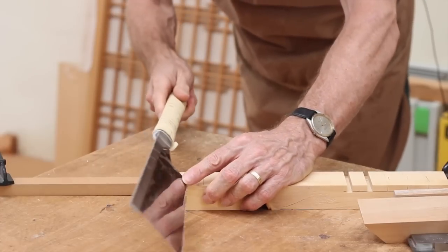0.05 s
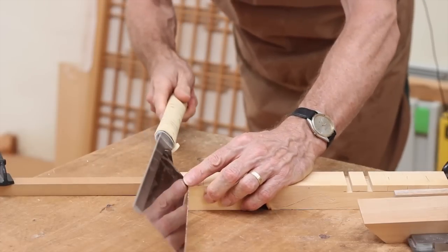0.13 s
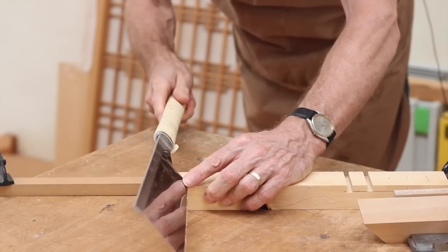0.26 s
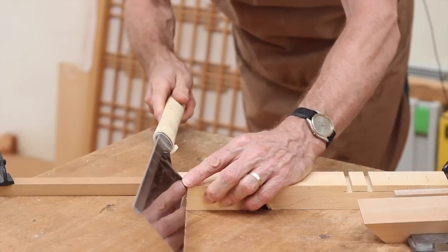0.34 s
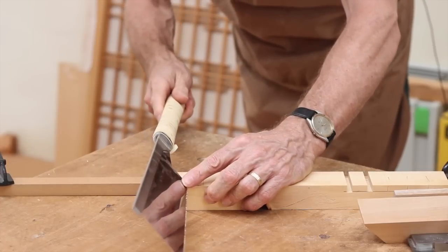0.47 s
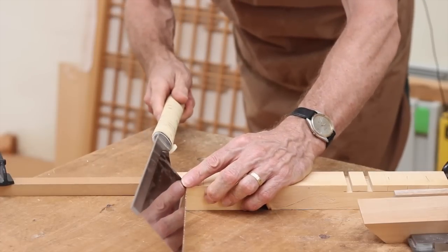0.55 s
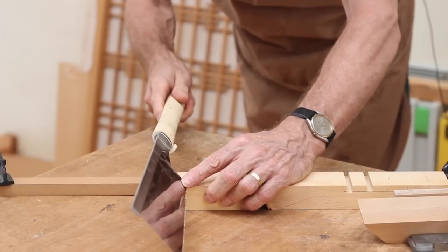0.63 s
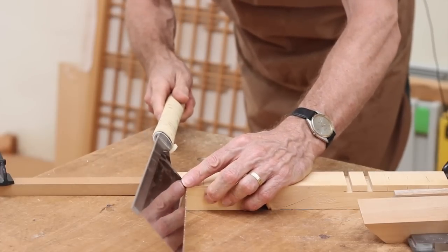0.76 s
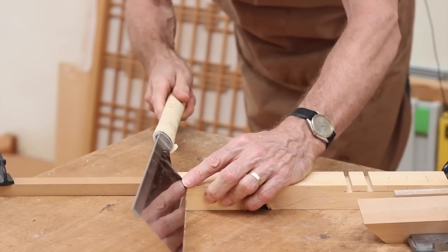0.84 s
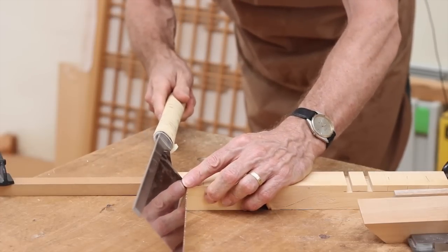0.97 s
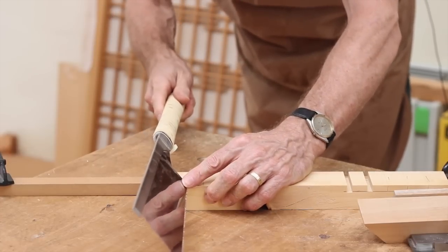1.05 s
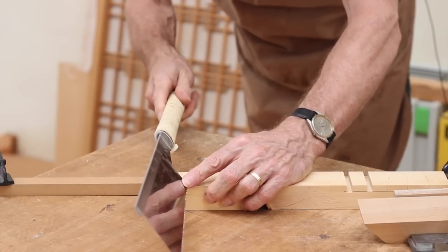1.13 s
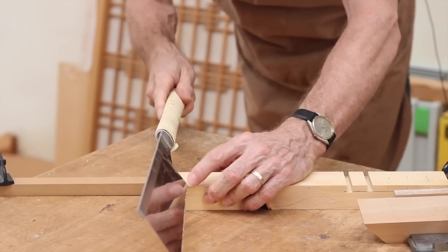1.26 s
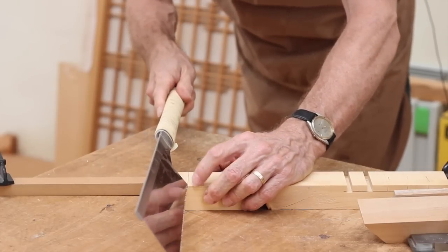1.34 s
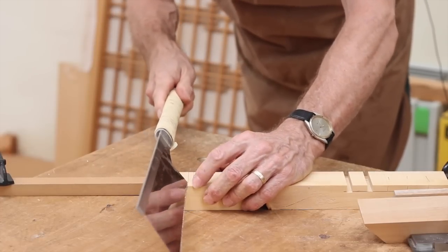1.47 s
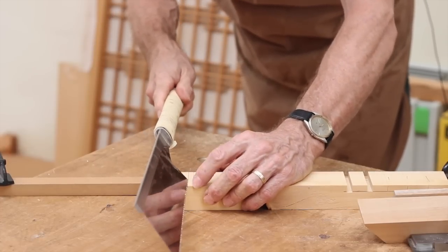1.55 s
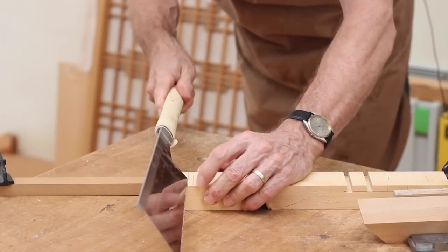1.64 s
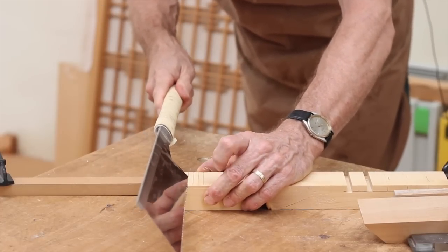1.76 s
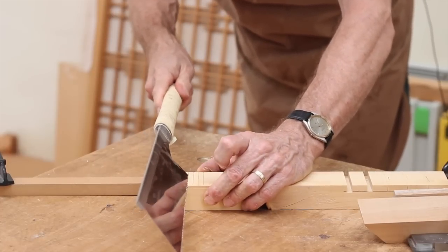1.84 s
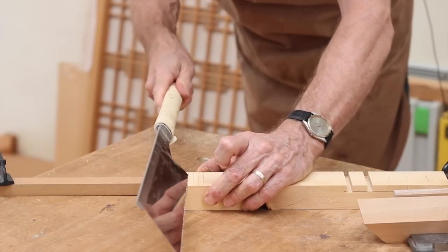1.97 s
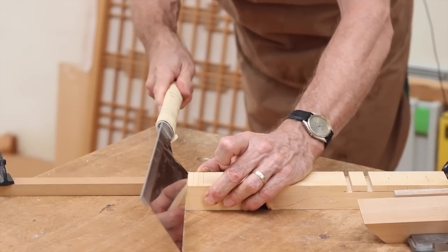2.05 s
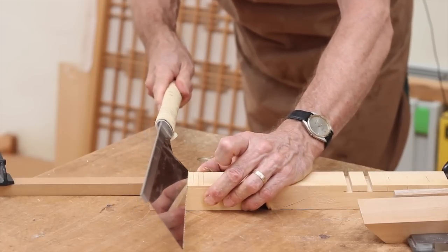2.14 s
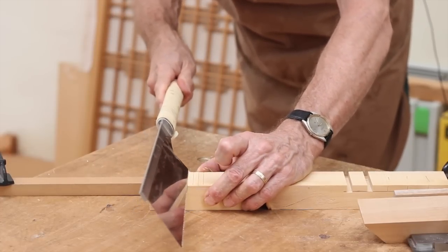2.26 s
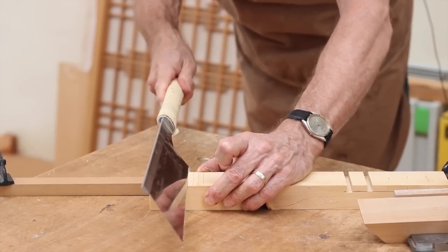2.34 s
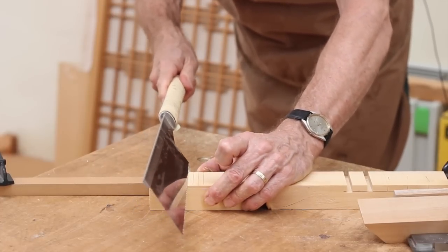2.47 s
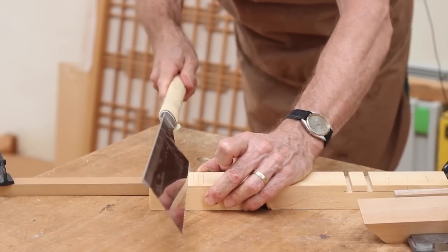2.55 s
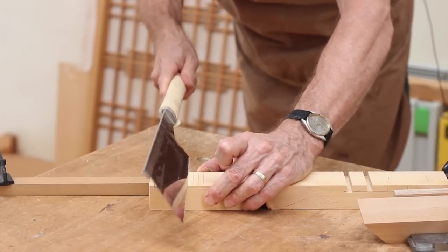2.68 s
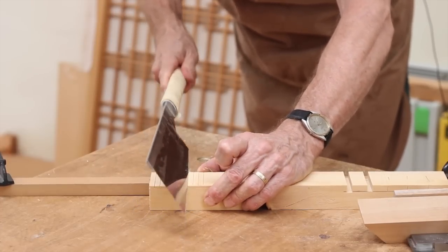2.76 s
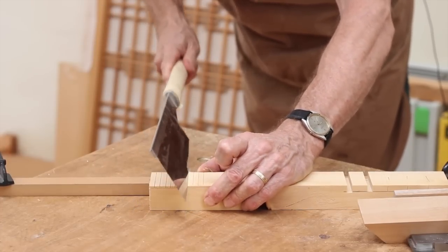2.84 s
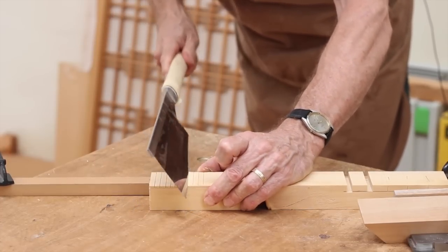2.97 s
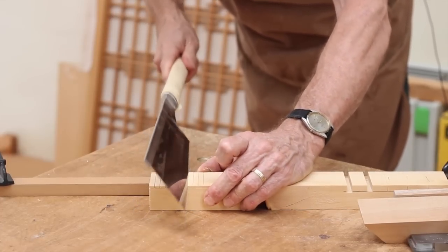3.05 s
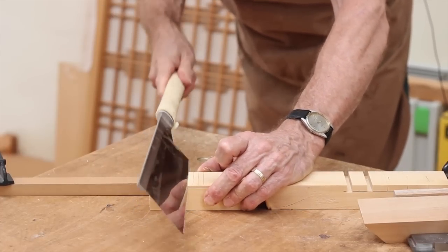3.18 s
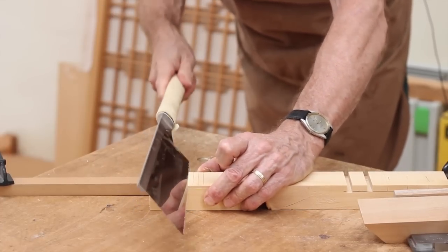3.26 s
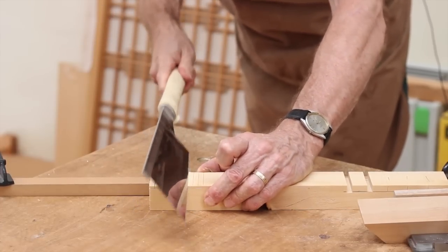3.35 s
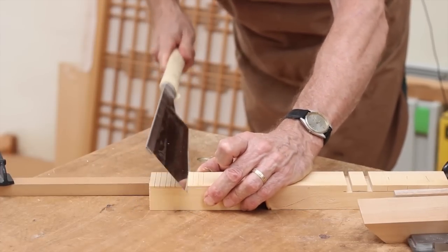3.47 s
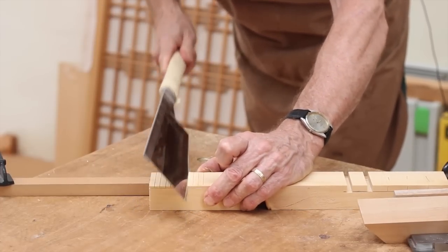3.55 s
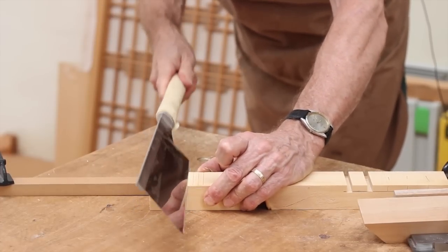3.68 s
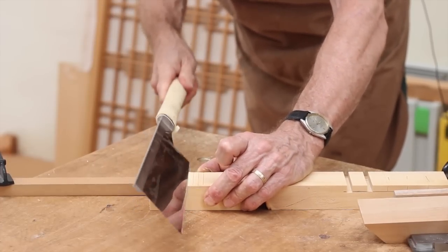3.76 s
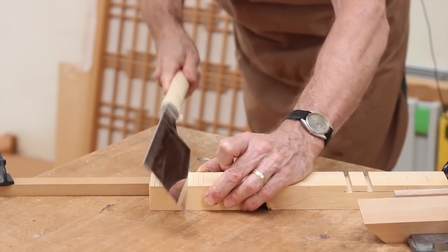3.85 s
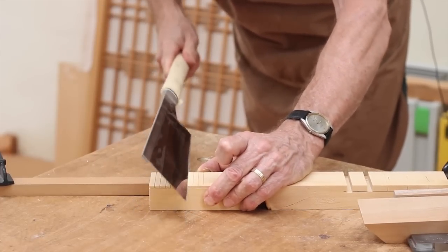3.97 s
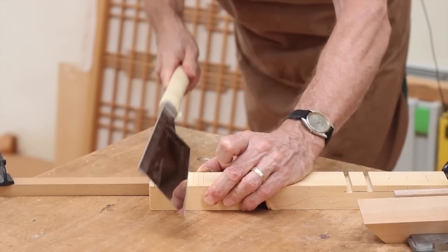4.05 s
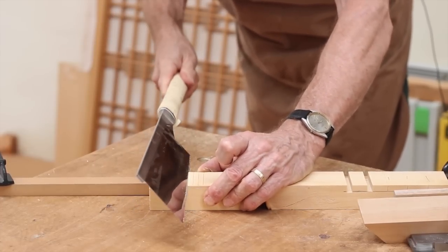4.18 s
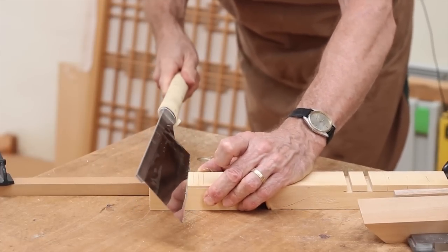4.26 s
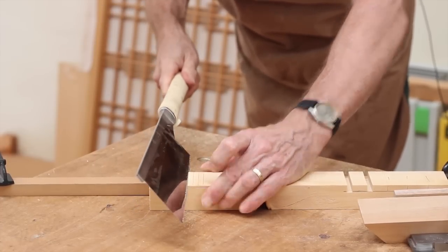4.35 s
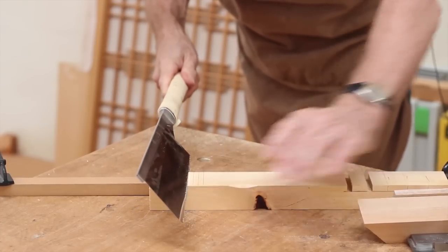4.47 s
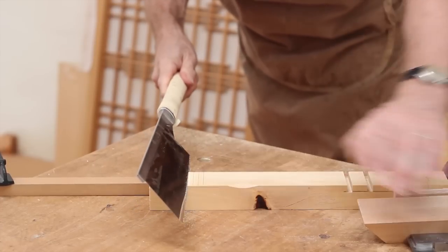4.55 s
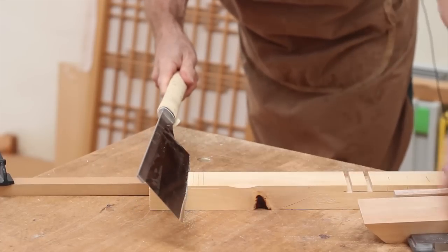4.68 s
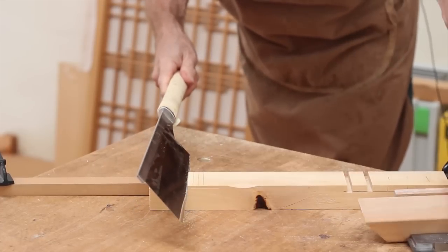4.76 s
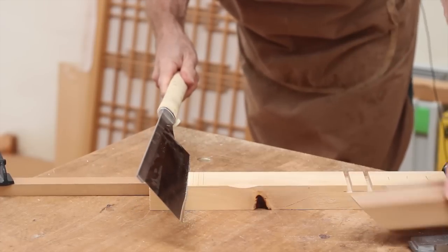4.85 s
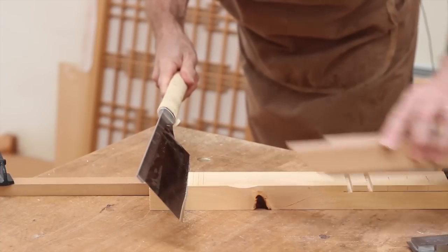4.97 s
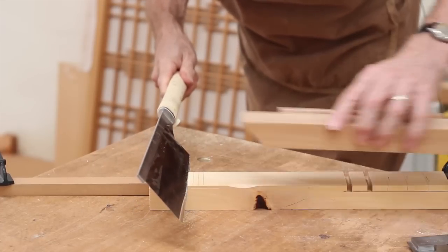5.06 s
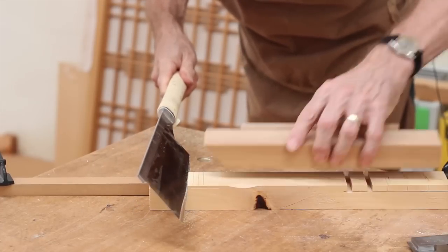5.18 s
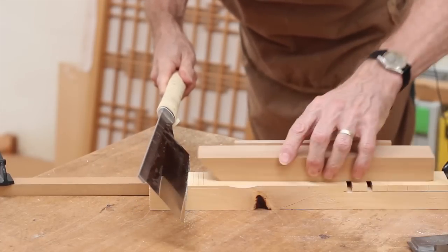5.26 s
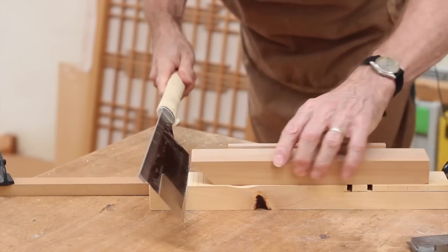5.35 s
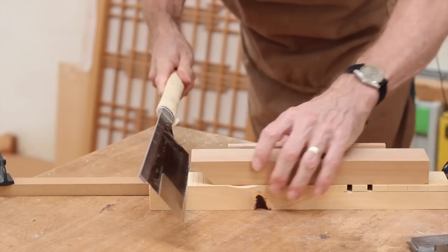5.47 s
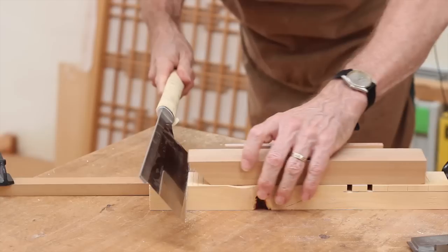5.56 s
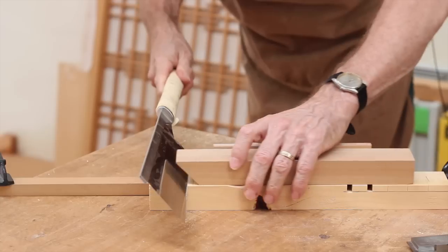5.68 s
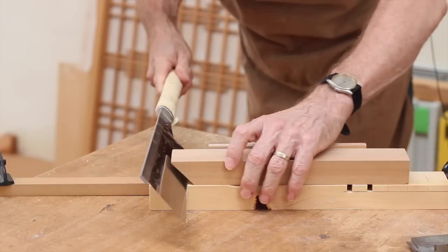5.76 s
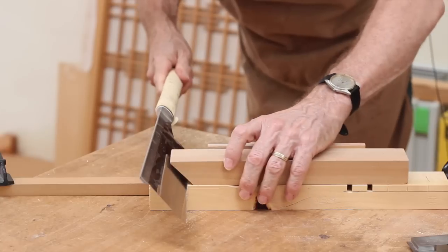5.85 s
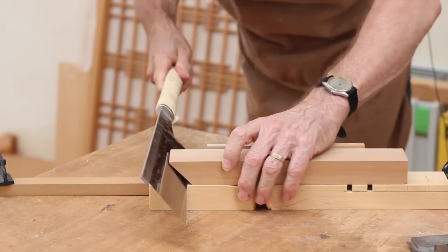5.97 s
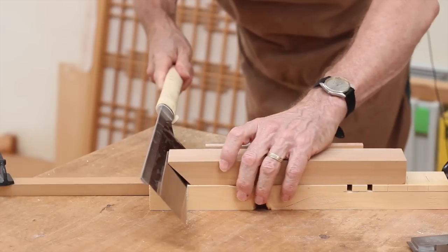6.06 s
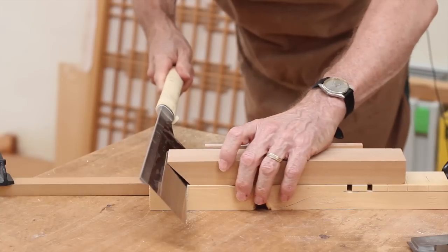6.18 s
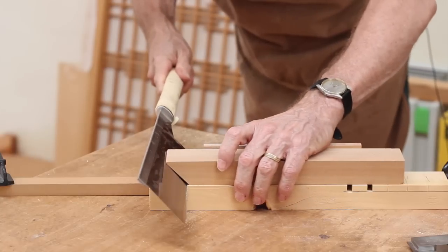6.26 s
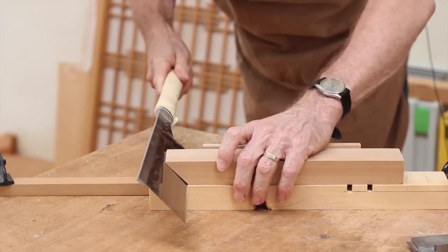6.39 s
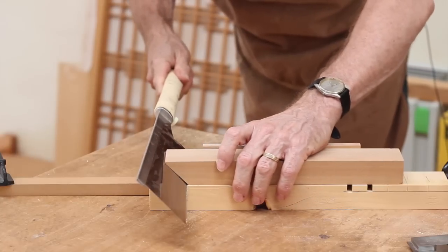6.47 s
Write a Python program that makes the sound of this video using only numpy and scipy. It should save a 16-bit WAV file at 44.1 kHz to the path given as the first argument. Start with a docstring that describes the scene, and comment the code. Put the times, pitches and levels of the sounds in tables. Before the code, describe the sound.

Low room rumble, soft air and electronic hiss run throughout; the work is close, in the left channel only, with a short workshop reverberation, while the right carries just hiss. For the first 1.4 seconds there are only faint tooth ticks and a few dull creaks. From 1.5 to 2.3 light, scratchy saw strokes mix with more low woody creaks as the hands shift. From 2.35 to 2.95 teeth catch in the fibres: uneven, crackling snaps with bright splintering. From 3.1 to 4.25 the saw runs freely in four quick rasps, roughly four per second, the one near 3.5 strongest and groaning. Sawing stops. A sleeve brushes at 4.6 to 4.75; at 4.9 a block drags briefly, juddering, with a tiny bright steel clink. At 5.37 it lands with a loud, hard wooden clack, a tight cluster of contacts, smaller taps at 5.45, then a faint settling slide and near quiet until 6.5.

```python
"""In a workshop, a pull saw crosscuts a batten held down on a bench, amid room air, low rumble and hiss.
The first strokes are light, then the teeth catch and snap fibres, then they run freely.
Each tooth is a click that shakes the batten, bench and blade; torn fibres and rubbing are coloured noise.
Dull creaks are runs of clicks as the hands shift; the sleeve and the dragged block are swelling noise.
The block clinks on a steel tool, then knocks on the work: clicks set off decaying tones and noise."""
import sys
import numpy as np
from scipy import signal
from scipy.fft import rfft, irfft
from scipy.io import wavfile
from scipy.ndimage import uniform_filter1d

SR = 44100
rng = np.random.default_rng(int(sys.argv[2]) if len(sys.argv) > 2 else 0)


def dump_mix(stems):
    """Bounce the given channels to the path in sys.argv[1] as a 16-bit WAV at rate SR."""
    frames = np.atleast_2d(stems).T  # one column per channel
    limited = np.clip(frames, -1, 1)  # hard clip at full scale
    pcm = np.round(limited * 32767).astype(np.int16)
    wavfile.write(sys.argv[1], SR, pcm)


N = 287532
TIME = np.arange(N) / SR  # seconds


def from_db(db):
    """Turn decibels into an amplitude factor."""
    return 10 ** (np.asarray(db) / 20)


def rms_one(x):
    """Scale a sound to unit power."""
    return x / np.sqrt(np.mean(x ** 2) + 1e-20)


def running_rms(x, seconds):
    """Follow the level over a short sliding window."""
    window = max(int(seconds * SR), 2)
    return np.sqrt(np.abs(uniform_filter1d(x ** 2, window)) + 1e-12)


def level_curve(rows):
    """Draw straight lines between (time, dB) points and give the amplitude at every sample."""
    times, levels_db = np.transpose(rows)
    return from_db(np.interp(TIME, times, levels_db))


def at_hz(points, hz, axis=1):
    """Read one column of a spectrum on a log-frequency axis."""
    points = np.array(points)
    return np.interp(np.log(hz + 1), np.log(points[:, 0]), points[:, axis])


def response(spectrum, size=2048):
    """Make the minimum-phase pulse of a spectrum: it starts at once, and its peak is 1."""
    hz = np.linspace(0, SR / 2, size // 2 + 1)
    cepstrum = irfft(np.log(from_db(at_hz(spectrum, hz))))
    # folding the second half onto the first leaves nothing before the start
    cepstrum[1:size // 2] *= 2
    cepstrum[size // 2 + 1:] = 0
    pulse = irfft(np.exp(rfft(cepstrum)))
    return pulse / np.abs(pulse).max()


def colour(x, spectrum):
    """Pass a sound through a body with this spectrum."""
    return signal.fftconvolve(x, response(spectrum))[:N]


def noise(spectrum):
    """Make coloured noise of unit power."""
    return rms_one(colour(rng.standard_normal(N), spectrum))


def band(x, kind, hz, order=4):
    """Keep part of the frequency range with a Butterworth filter."""
    return signal.sosfilt(signal.butter(order, hz, kind, fs=SR, output="sos"), x)


def smooth(x, seconds):
    """Smooth a signal with one pole."""
    r = np.exp(-1 / (seconds * SR))
    return signal.lfilter([1 - r], [1, -r], x + 1e-18)


def flutter(hz):
    """Wander at random below this frequency, with unit spread."""
    return rms_one(band(rng.standard_normal(N), "low", hz, order=2))


def clicks(rows, axis=1):
    """Place one impulse for each event, at the level in the given column."""
    rows, out = np.array(rows), np.zeros(N)
    samples = (rows[:, 0] * SR).astype(int)
    out[samples] = from_db(rows[:, axis])
    return out


def splinter(x, seconds):
    """Turn each click into a dying puff of noise with the same energy."""
    envelope = np.sqrt(smooth(x ** 2, seconds))
    return envelope * rng.standard_normal(N)


def ring(x, modes):
    """Strike a body: a unit click starts each of its modes as a decaying sine."""
    out = 0
    for hz, db, t60 in modes:
        r, w = from_db(-60 / (t60 * SR)), 2 * np.pi * hz / SR
        sine = signal.lfilter([0, np.sin(w)], [1, -2 * r * np.cos(w), r * r], x + 1e-18)
        out = out + from_db(db) * sine
    return out


def resonate(x, resonances):
    """Add up resonances, each with its listed gain at its top and a set width."""
    out = 0
    for hz, width, db in resonances:
        r = np.exp(-np.pi * width / SR)
        top_is_one = np.array([1, 0, -1]) * (1 - r * r) / 2
        poles = [1, -2 * r * np.cos(2 * np.pi * hz / SR), r * r]
        out = out + from_db(db) * signal.lfilter(top_is_one, poles, x)
    return out


def preamplifier_hiss():
    """Separate white noise in each channel, from the electronics."""
    return from_db(-52) * rng.standard_normal((2, N))


# low rumble colour: (frequency [Hz], level [dB])
RUMBLE_COLOUR = [(20, -3.5), (45, -3), (80, 4), (130, -2), (220, -1.5), (330, -7.5), (600, -24.5),
                 (2000, -39)]
# room air colour: (frequency [Hz], level [dB])
AIR_COLOUR = [(150, -25.5), (400, -3), (650, -3), (900, 1.5), (1150, -2), (1600, -8.5), (2300, -15.5),
              (3500, -26), (8000, -45)]
# loudness of the room air: (time [s], level [dB])
AIR_LEVEL = [(0, -42.5), (1.2, -42.5), (2.2, -43), (4.4, -42), (5.3, -45.5), (5.8, -47.5), (6.5, -47)]


def room_tone():
    """A steady low rumble under a band of air noise whose level drifts."""
    return from_db(-44.5) * noise(RUMBLE_COLOUR) + level_curve(AIR_LEVEL) * noise(AIR_COLOUR)


# reverberation: (frequency [Hz], time to fall by 60 dB [s], level [dB])
REVERBERATION = [(157, 0.67, 0), (412, 0.48, -3), (1080, 0.19, -17.5), (2290, 0.83, -22), (4650, 0.89, 0.5),
                 (12000, 0.28, -56)]


def workshop(x, size=32768):
    """Diffuse reflections, dying at their own pace in each octave."""
    t, tail = np.arange(size) / SR, 0
    for low in 62.5 * 2 ** np.arange(8):
        middle = low * np.sqrt(2)
        decay = from_db(-60 * t / at_hz(REVERBERATION, middle))
        # silent for 7.5 ms, then rising until 22.5 ms
        decay = decay * np.clip(t / 0.015 - .5, 0, 1)
        gain = from_db(at_hz(REVERBERATION, middle, axis=2)) / np.sqrt(np.sum(decay ** 2))
        octave = band(rng.standard_normal(size), "band", [low, 2 * low], order=2)
        tail = tail + gain * decay * octave
    return signal.fftconvolve(x, tail)[:N]


# dull creaks: (time [s], length [s], number of jerks, level before an overall lift [dB])
CREAK_RUNS = [(.0144, .0353, 4, -25), (.6578, .0264, 2, -23), (1.3823, .035, 3, -21),
              (1.4649, .038, 5, -21.5), (1.5209, .024, 2, -19), (1.5767, .0583, 4, -19),
              (1.6687, .0268, 2, -20.5), (1.7551, .0195, 2, -21.5), (1.9427, 0, 1, -20.5),
              (2.0534, .0427, 3, -18), (2.1401, .057, 2, -15), (4.345, .066, 2, -32),
              (4.5201, .054, 4, -26.5), (4.8929, .0217, 2, -25), (5.2787, .0318, 2, -25.5)]


def jerks():
    """Each creak sticks and slips at a nearly even pace: rows of (time, dB)."""
    jitter, spread_db = 0.13, 0.6  # share of the gap between jerks; spread of their strength
    rows = []
    for start, length, count, db in CREAK_RUNS:
        steps = np.arange(max(int(round(count)), 1))
        shift, strength = rng.standard_normal((2, len(steps)))
        inner = (steps > 0) * (steps < steps[-1])  # the first and last jerk stay in place
        wander = jitter * shift * inner
        times = start + length * (steps + wander) / max(steps[-1], 1)
        rows += zip(times, db + spread_db * strength)
    return rows


# creak colour: (frequency [Hz], level [dB])
CREAK_COLOUR = [(40, -52), (110, -15), (220, -2.5), (400, 1.5), (560, -3.5), (700, -14.5), (1350, -11.5),
                (1900, -32), (2700, -35), (3700, -28), (5000, -47), (16000, -51)]


def creaks():
    """Stick-slip jerks, one click each, heard through dull wood as the hands shift."""
    return from_db(3.5) * colour(clicks(jerks()), CREAK_COLOUR)


# sleeve sliding on the apron: (time [s], level [dB])
SLEEVE_LEVEL = [(4.55, -61), (4.59, -37), (4.65, -36), (4.72, -37.5), (4.78, -54)]
# cloth colour: (frequency [Hz], level [dB])
CLOTH_COLOUR = [(100, 2), (400, 3.5), (1300, -5.5), (2200, -7), (4000, -7), (7000, -16.5), (12000, -23),
                (16000, -35)]


def sleeve():
    """Cloth rubbing on cloth: soft noise that swells and fades."""
    return level_curve(SLEEVE_LEVEL) * noise(CLOTH_COLOUR)


# block dragged off the bench, before its judder: (time [s], level [dB])
DRAG_LEVEL = [(4.87, -82), (4.893, -36), (4.92, -30.5), (4.95, -29.5), (5.0, -52), (5.06, -75)]
# sliding wood colour: (frequency [Hz], level [dB])
SLIDE_COLOUR = [(80, 4.5), (300, 2), (600, 5), (1300, 3.5), (2200, -12.5), (4000, -20), (11000, -23),
                (16000, -43)]


def drag():
    """Wood sliding on wood: noise whose level judders at random."""
    judder = from_db(1.7 * flutter(hz=118))
    return level_curve(DRAG_LEVEL) * judder * noise(SLIDE_COLOUR)


# bright splinter colour: (frequency [Hz], level [dB])
SPLINTER_COLOUR = [(800, -12), (2000, 10.5), (3000, 2), (4500, -3), (7000, -13), (12500, -7), (16000, -5.5)]


def bright_splinters(x, seconds):
    """Short bright puffs of noise, one for each click."""
    return colour(splinter(x, seconds), SPLINTER_COLOUR)


# block brushing a steel tool: (time [s], level [dB])
CLINK_TOUCHES = [(4.889, -38), (4.905, -50), (4.919, -28)]
# steel tool modes: (frequency [Hz], level [dB], time to fall by 60 dB [s])
STEEL_MODES = [(4700, -7, 0.12), (5060, -2.5, 0.05), (8600, -11, 0.054), (10560, -8, 0.035),
               (11700, -17, 0.077)]


def clinks():
    """Each touch rings the steel and adds a bright puff of noise."""
    touches = clicks(CLINK_TOUCHES)
    return ring(touches, STEEL_MODES) + from_db(13.5) * bright_splinters(touches, seconds=0.0028)


# block landing and settling: (time [s], ring and clatter level [dB], crack level [dB])
BLOCK_KNOCKS = [(5.3649, 7.5, 8), (5.3678, 1.5, 4.5), (5.3705, 3.5, 2), (5.3745, -16, -25),
                (5.3785, -1, -24), (5.4447, -21, 0.5), (5.4655, -32, -10), (5.6515, -24.5, -42),
                (6.121, -26, -41)]
# block modes: (frequency [Hz], level [dB], time to fall by 60 dB [s])
BLOCK_MODES = [(220, -37, .45), (240, -39, .09), (360, -36, .06), (490, -31, .04), (715, -35, .03),
               (885, -18, .03), (1030, -21, .025), (1349, -10, .032), (1537, -9, .035), (1655, -17, .028),
               (2003, -19, .024), (2235, -24, .022), (2463, -25, .022)]
# clatter of flat faces: (frequency [Hz], level [dB])
CLATTER_COLOUR = [(150, -26), (450, -19), (680, -26), (900, -6), (1400, 2), (2300, -7), (3000, -24),
                  (4300, -27), (16000, -55)]
# crack of a hard contact: (frequency [Hz], level [dB])
CRACK_COLOUR = [(100, -6), (600, -15), (1200, 19.5), (2300, 9.5), (3000, -3), (4000, -4.5), (5500, -11),
                (8000, -27), (16000, -62)]
# block sliding into place: (time [s], level [dB])
SETTLING_LEVEL = [(5.38, -70), (5.45, -42), (5.56, -59), (5.7, -45.5), (5.8, -47), (5.92, -54)]


def block():
    """Wood on wood: each contact cracks, clatters and rings the modes; then the block slides home."""
    blows = clicks(BLOCK_KNOCKS)
    ringing = ring(blows, BLOCK_MODES)
    clatter = colour(splinter(blows, seconds=.0035), CLATTER_COLOUR)
    crack = colour(splinter(clicks(BLOCK_KNOCKS, axis=2), seconds=0.00038), CRACK_COLOUR)
    slide = level_curve(SETTLING_LEVEL) * noise(CLATTER_COLOUR)
    # so small a block radiates almost no bass
    return band(ringing + clatter + crack + slide, "high", 97, order=2)


# paths from the teeth through the blade: plain list of delays [s]
BLADE_PATHS = [.0007, .0013, .0021, .0034]


def disperse(x):
    """A tooth's blow runs to and fro in the blade and comes out smeared over a few milliseconds."""
    for seconds in BLADE_PATHS:
        allpass = np.zeros(int(seconds * SR))
        allpass[0], allpass[-1] = .6, 1
        x = signal.lfilter(allpass, allpass[::-1], x)
    return x


# teeth snagging in the fibres: (time [s], snap level [dB], splinter level [dB])
SNAG_EVENTS = [(1.53, -32, -15), (1.617, -32, -13), (2.351, -22, -14), (2.376, -9.5, -6),
               (2.399, -4.5, -14.5), (2.422, -5.5, -22), (2.449, -4, -9), (2.46, -3.5, -15),
               (2.512, 1, -3.5), (2.526, 2.5, -6), (2.583, -10, -7), (2.598, -1, -8), (2.617, 1.5, -8.5),
               (2.729, -4.5, -0.5), (2.742, -12, -0.5), (2.753, -6, -5), (2.858, -3.5, -4),
               (2.873, -2, 4.5), (2.901, 0, -11), (2.916, -1.5, -13)]
# snap colour: (frequency [Hz], level [dB])
SNAG_COLOUR = [(60, -0.5), (300, -9), (700, 8), (950, 13), (1400, -5), (2300, -5.5), (3200, -52),
               (6000, -47), (16000, -55)]


def snags():
    """A caught tooth breaks free with a snap of the batten; some snaps splinter brightly."""
    snaps = clicks(SNAG_EVENTS)
    snap_mix = 0.97 * snaps + 0.14 * disperse(snaps) + 0.6 * splinter(snaps, seconds=0.0028)
    splinters = bright_splinters(clicks(SNAG_EVENTS, axis=2), seconds=0.00097)
    return colour(snap_mix, SNAG_COLOUR) + splinters


# saw strokes: (time [s], length [s], top speed before jitter [teeth per s], wood body level [dB],
# tooth rasp level [dB], kerf hiss level [dB], groan level [dB], body and groan swell from start to end [dB],
# deepest bite [share of the length], bite boost [dB], unevenness of the teeth [dB])
SAW_STROKES = [(1.488, 0.24, 194, -33, -37, -50, -58, -7, 0.7, 4, 6.5),
               (1.728, 0.29, 156, -35, -40, -51.5, -53, 3, 0.23, 8.5, 4.5),
               (2.108, .2, 138, -33, -34, -40.5, -31.5, -7, 0.39, 1, 4.5),
               (2.31, 0.32, 179, -23, -32, -35.5, -28.5, 13, 0.32, 8, 5),
               (2.691, 0.39, 195, -19, -23, -36.5, -40, -5.5, 0.528, 9.5, 5.5),
               (3.08, .29, 319, -28, -30, -36, -44, -14, 0.95, 3, 3.5),
               (3.384, .26, 300, -16, -23, -25.5, -22, 8.5, 0.66, 8, 3),
               (3.623, .25, 298, -23.5, -23, -27.5, -35, -31.5, 0.75, 2, 5),
               (3.841, .25, 470, -25.5, -24.5, -29.5, -33, -12.5, 0.94, 7, 4.5),
               (4.069, 0.2, 348, -30, -26, -36.5, -41.5, -17.5, 0.17, 1, 4.5)]


def stroke_controls():
    """Tooth rate, unevenness, progress, and the four layer gains, which follow effort and bite."""
    crawl = 48.0  # teeth per s, before jitter, between strokes
    rate, uneven = np.full(N, crawl), np.zeros(N)
    progress, gains = np.zeros(N), np.zeros((4, N))
    for (start, length, top, body_db, rasp_db, hiss_db, groan_db,
         swell_db, bite_at, bite_db, uneven_db) in SAW_STROKES:
        during = (TIME > start) & (TIME < start + length)
        t = TIME[during] - start
        effort = np.abs(np.sin(np.pi * t / length))
        # the flatter second arch keeps most of the speed until the hand turns
        speed = effort ** np.where(t < length / 2, .9, .45)
        bite = bite_db * np.exp(-((t - bite_at * length) / 0.038) ** 2)
        weight = bite + swell_db * (t / length - .5)
        slack = 1 - effort
        # each layer falls by its own number of dB towards the turns; the hiss hardly feels the bite
        levels = [body_db + weight - 10.5 * slack,
                  rasp_db + bite - 20 * slack,
                  hiss_db + 0.061 * bite - 18 * slack,
                  groan_db + weight - 4.5 * slack]
        # the teeth take hold and let go over 35 ms
        hold = np.clip(np.minimum(t, length - t) / 0.035, 0, 1)
        gains[:, during] += from_db(levels) * hold
        rate[during] = crawl + (top - crawl) * speed
        uneven[during], progress[during] = uneven_db, t / length
    return rate, uneven, progress, gains


def tooth_travel(rate, uneven_db):
    """Teeth passed so far; where they bite unevenly the blade moves in fits and starts."""
    # share of the rate: a least jitter, and more for each dB of unevenness above a clean cut's 3 dB
    jitter = .02 + .1 * np.maximum(uneven_db - 3, 0)
    pace = np.maximum(1 + jitter * flutter(hz=120.4), 0)
    return np.cumsum(rate * pace) / SR


def tooth_strikes(rate, travel, uneven_db):
    """One click for each tooth entering the wood; teeth in a stroke bite with random strength."""
    entering = np.diff(np.floor(travel), prepend=0)
    strength = from_db(uneven_db * rng.standard_normal(N))
    # a faster rate brings more clicks, so each is made weaker
    return entering * strength / np.sqrt(rate / SR)


# groan colour: (frequency [Hz], level [dB])
GROAN_COLOUR = [(90, 0), (150, -0.5), (180, -6), (235, 1), (290, 4.5), (430, -0.5), (590, -15), (750, -2),
                (900, -1), (1190, -5), (1500, -6), (2400, -8), (4000, -36.5)]


def groan(rate, travel, count=12):
    """Evenly biting teeth drive the batten at the tooth rate and its multiples, each swelling alone."""
    tone, power = 0, 0
    for k in range(1, count + 1):
        gain = from_db(at_hz(GROAN_COLOUR, k * rate))
        swell = from_db(2.2 * flutter(hz=30))
        tone = tone + gain * swell * np.sin(2 * np.pi * (k * travel + rng.random()))
        power = power + gain ** 2 / 2
    return tone / np.sqrt(power)


def blade_echo(x, progress, rate, count=2):
    """Bending waves return from the receding blade end, ever later, so the rasp's resonances glide down."""
    delay = .0015 * (1 + .45 * (progress - .5))  # seconds
    # the wood damps a slow blade; above 162 teeth per s it begins to ring freely
    gain = .6 * np.clip(rate / 162 - 1, 0, 1)
    echoes = sum(gain ** k * np.interp(TIME - k * delay, TIME, x) for k in range(1, count + 1))
    return x + echoes


# bench resonances: (frequency [Hz], width [Hz], level [dB])
BENCH_RESONANCES = [(178.6, 12, -2.5), (228, 17, -5.5), (295, 18, -4.5), (413, 38, 3), (550.5, 12, 3),
                    (608, 84, -1), (828, 14, -0.5), (1195, 16, -6)]


def bench(x):
    """The bench sings along with what shakes it and rings on after it."""
    return resonate(x, BENCH_RESONANCES)


# steel blade resonances: (frequency [Hz], width [Hz], level [dB])
BLADE_RESONANCES = [(1610, 30, -12.5), (1650, 33, -10), (1760, 40, -9.5), (2100, 31, -16), (2333, 81, -1.5),
                    (2645, 100, -4.5), (2750, 40, -11), (2850, 34, -15), (3180, 25, -5), (3645, 64, 2),
                    (4110, 87, 1)]


def blade(x):
    """The steel blade rings at its own resonances."""
    return resonate(x, BLADE_RESONANCES)


# colour of the cut wood: (frequency [Hz], level [dB])
CUT_COLOUR = [(40, -28.5), (110, -15.5), (200, -4.5), (400, -5.5), (700, -2), (950, 2), (1300, -1.5),
              (1550, -7), (2200, -7), (2900, -12), (3800, -21.5), (6000, -32), (16000, -49.5)]
# colour of steel hissing in the kerf, the saw's slot: (frequency [Hz], level [dB])
KERF_COLOUR = [(2000, -1), (3500, 5.5), (4600, 4.5), (7000, 1), (9000, 2), (12500, 5), (16000, -4)]


def saw():
    """Teeth strike and tear the fibres; batten, bench and blade sound while steel hisses in the kerf."""
    rate, uneven_db, progress, gains = stroke_controls()
    body_gain, rasp_gain, hiss_gain, groan_gain = gains
    travel = tooth_travel(rate, uneven_db)
    strikes = tooth_strikes(rate, travel, uneven_db)
    blows = disperse(strikes)
    tearing = splinter(strikes, seconds=.0025)
    rubbing = rng.standard_normal(N)
    # fast teeth cut more evenly, so their harmonics stand out of the noise
    ragged = np.interp(rate, [140, 240], [1, .8])
    wood = colour(blows + ragged * (.55 * tearing + .42 * rubbing), CUT_COLOUR)
    wood = wood + bench(wood) + blade(wood)
    # body and rasp are evened out first, so that the stroke gains set their levels
    body = band(wood, "low", 1500) / running_rms(band(wood, "band", [600, 1500]), .03)
    rasp = band(blade_echo(wood, progress, rate), "high", 1500)
    rasp = rasp / running_rms(rasp, .03)
    hiss = rms_one(colour(0.16 * blows + tearing + rubbing, KERF_COLOUR))
    tone = groan_gain * groan(rate, travel)
    tone_on_bench = .5 * (tone + from_db(5) * bench(tone))
    return body_gain * body + rasp_gain * rasp + hiss_gain * hiss + tone_on_bench


def scene():
    """One close microphone on the left; both channels carry preamplifier hiss."""
    rustle = sleeve() + drag() + clinks()
    work = band(saw() + snags() + rustle, "high", 69, order=2) + block()
    microphone = work + workshop(work) + creaks() + room_tone()
    return preamplifier_hiss() + np.array([microphone, np.zeros(N)])


def gain_control(x, threshold_db, release_db_per_s, attack_s):
    """Loud sounds pull the gain down quickly; it climbs back at a steady rate."""
    power = smooth(np.minimum(x ** 2, 1), attack_s)  # the detector saturates at full scale
    excess = np.maximum(10 * np.log10(power) - threshold_db, 0)
    held = np.maximum.accumulate(excess + release_db_per_s * TIME) - release_db_per_s * TIME
    return from_db(-smooth(held, attack_s))


def record(dry):
    """The left channel sets one gain for both; peaks beyond full scale clip and the top is cut."""
    gain = gain_control(dry[0], threshold_db=-17.5, release_db_per_s=35, attack_s=.018)
    clipped = np.clip(dry * gain, -1, 1)
    top_cut = signal.ellip(12, .1, 90, 15900, fs=SR, output="sos")  # cutoff in Hz
    return signal.sosfilt(top_cut, clipped)


dry = scene()
out = record(dry)
dump_mix(out)
```